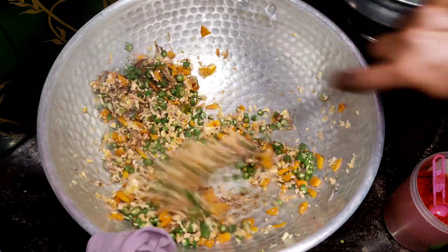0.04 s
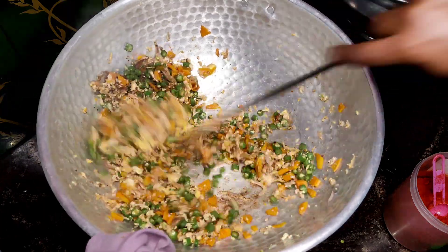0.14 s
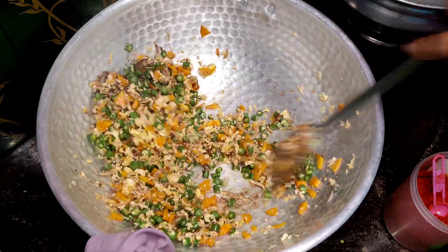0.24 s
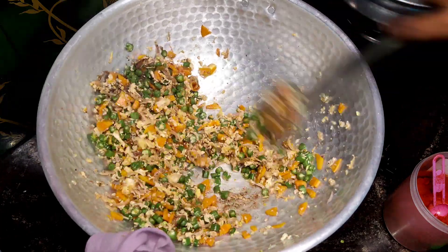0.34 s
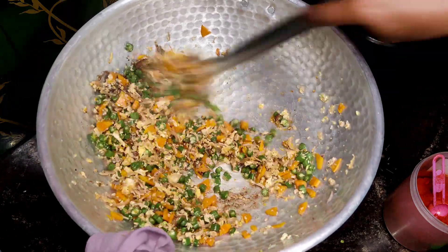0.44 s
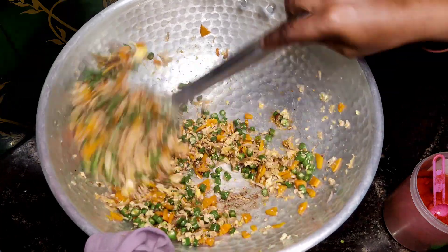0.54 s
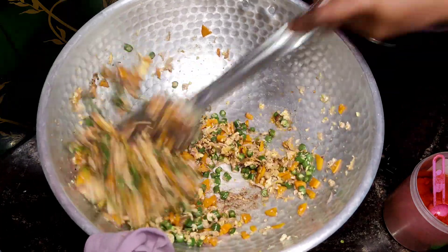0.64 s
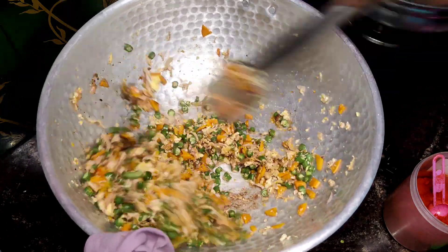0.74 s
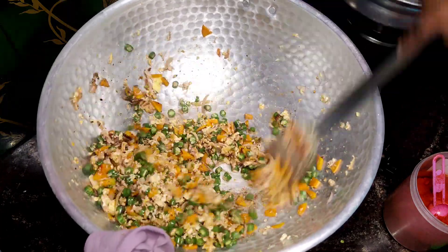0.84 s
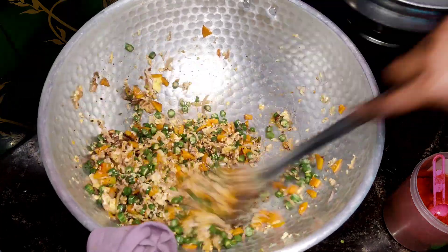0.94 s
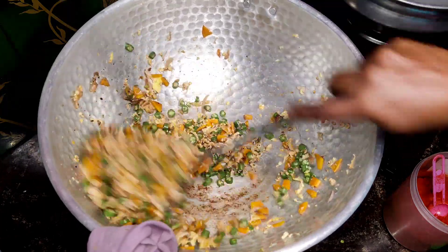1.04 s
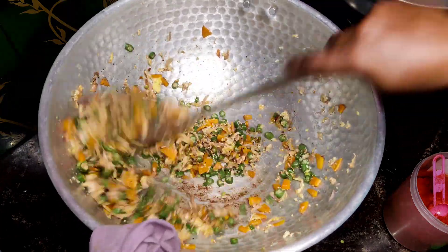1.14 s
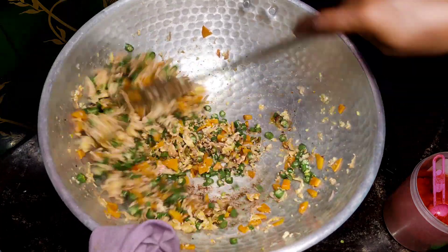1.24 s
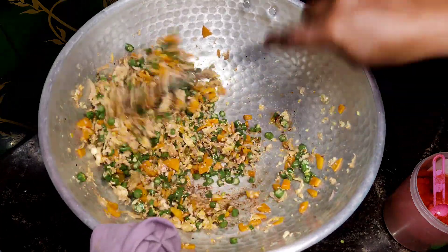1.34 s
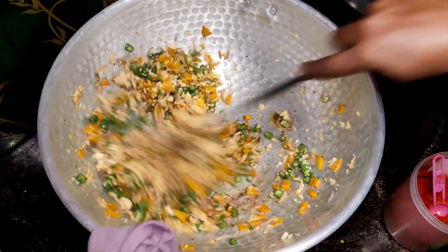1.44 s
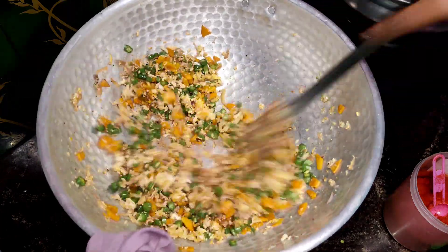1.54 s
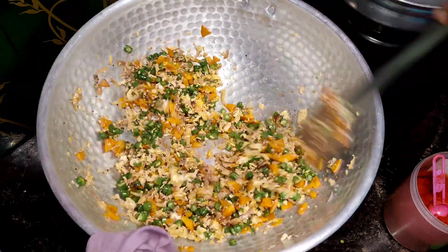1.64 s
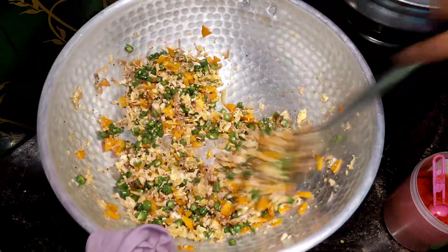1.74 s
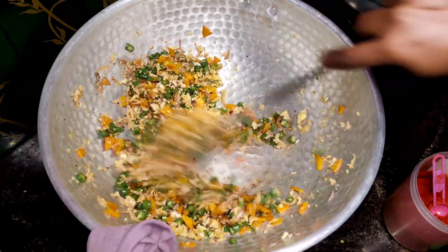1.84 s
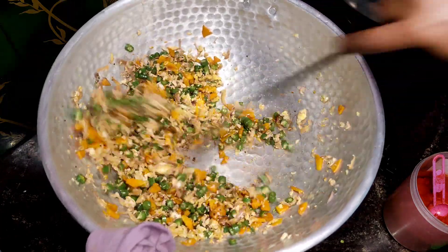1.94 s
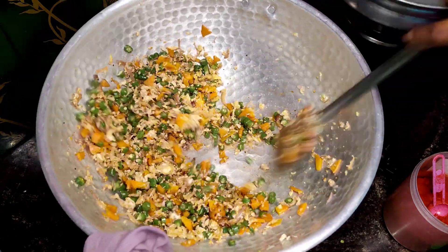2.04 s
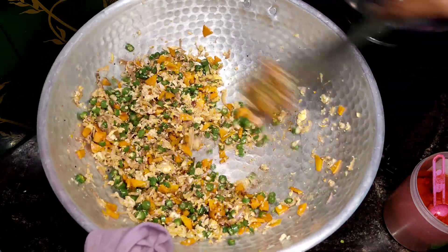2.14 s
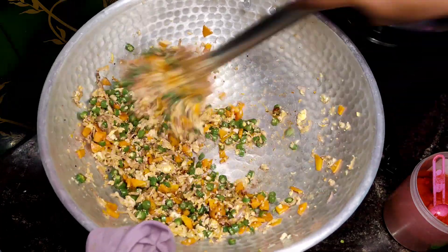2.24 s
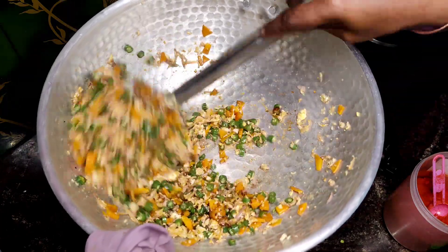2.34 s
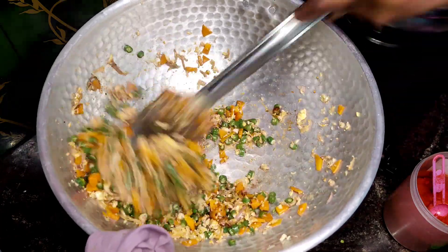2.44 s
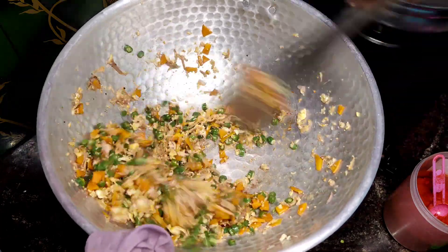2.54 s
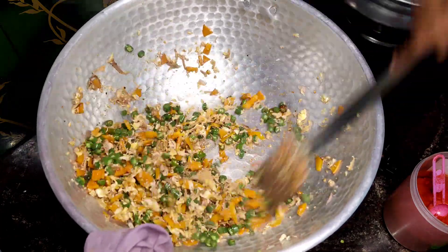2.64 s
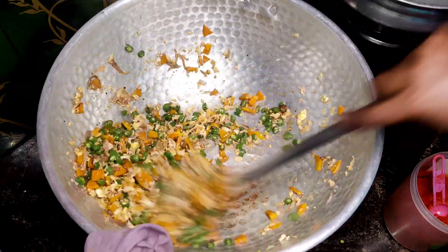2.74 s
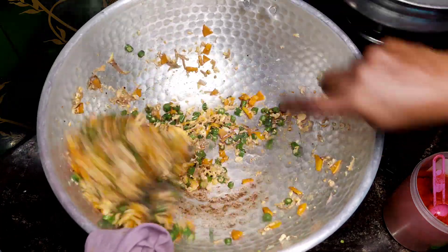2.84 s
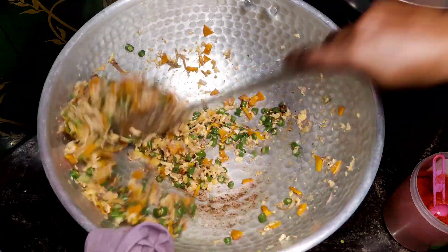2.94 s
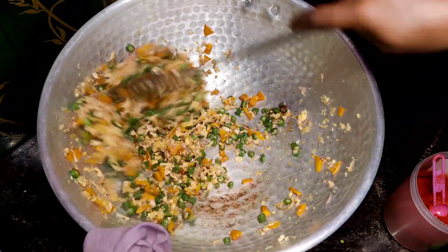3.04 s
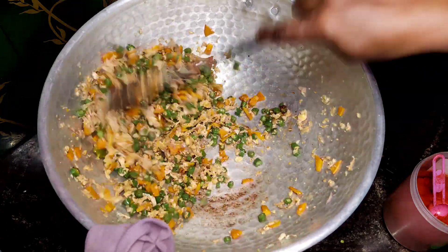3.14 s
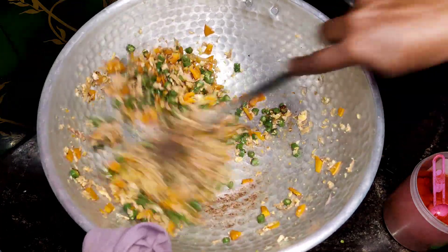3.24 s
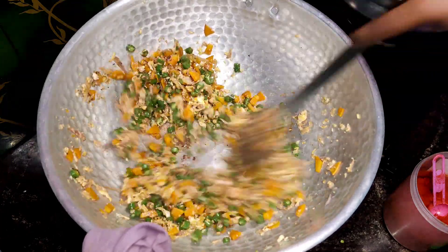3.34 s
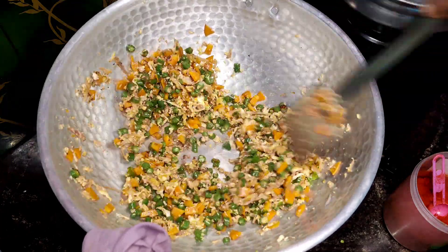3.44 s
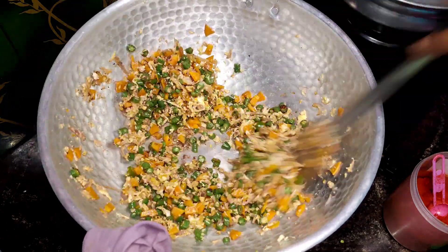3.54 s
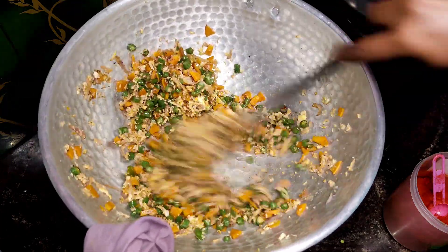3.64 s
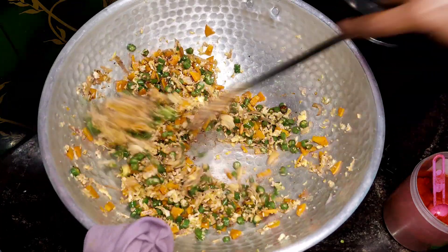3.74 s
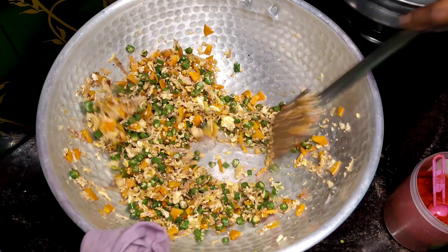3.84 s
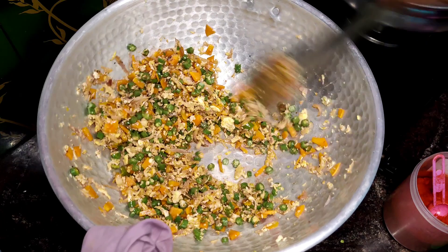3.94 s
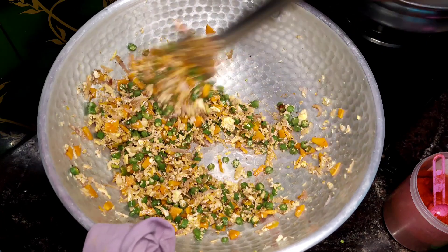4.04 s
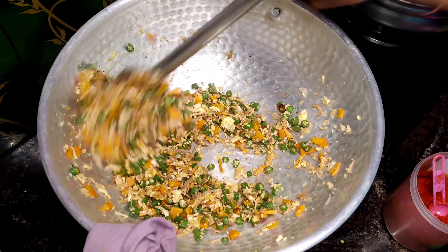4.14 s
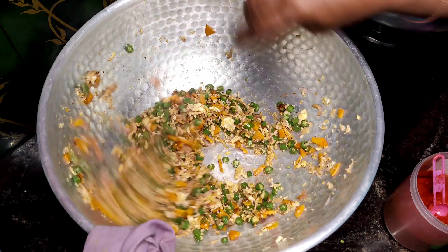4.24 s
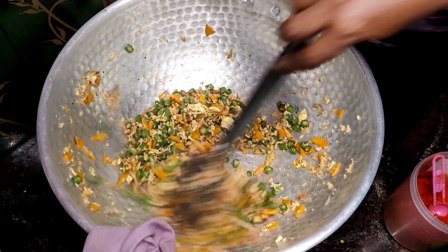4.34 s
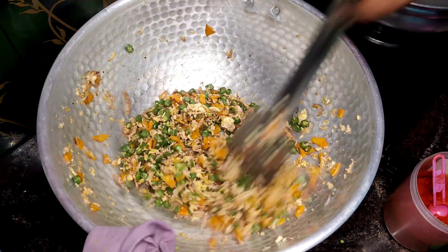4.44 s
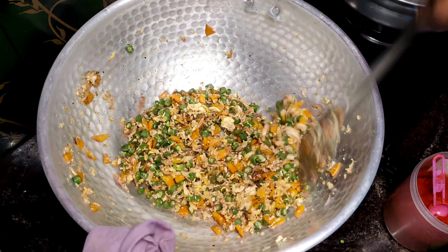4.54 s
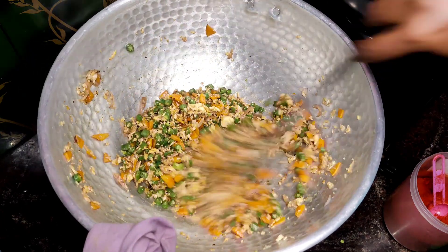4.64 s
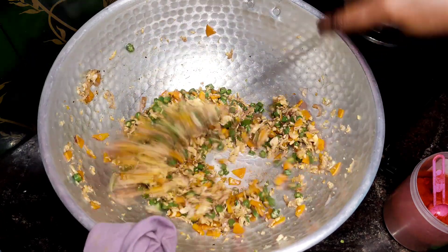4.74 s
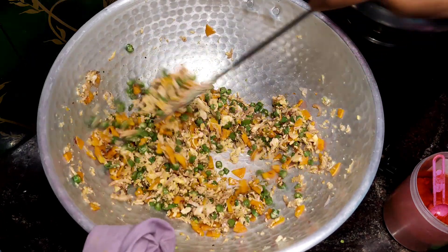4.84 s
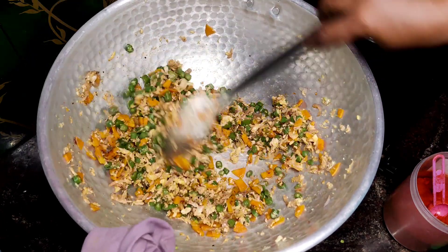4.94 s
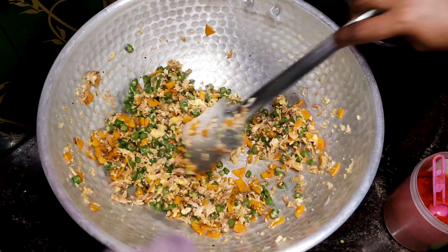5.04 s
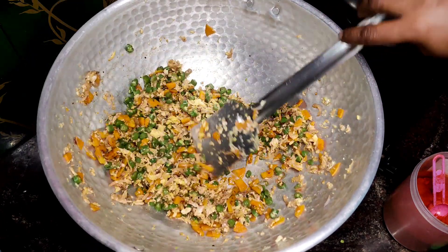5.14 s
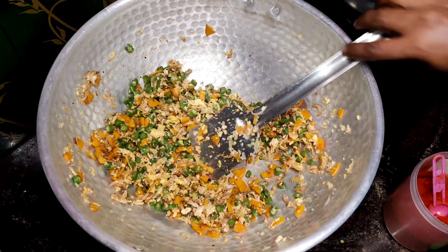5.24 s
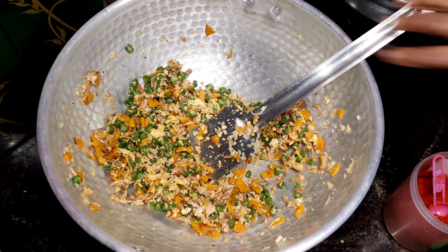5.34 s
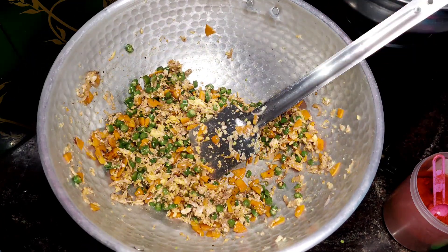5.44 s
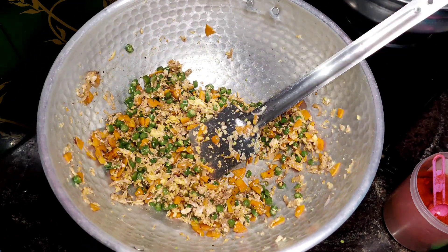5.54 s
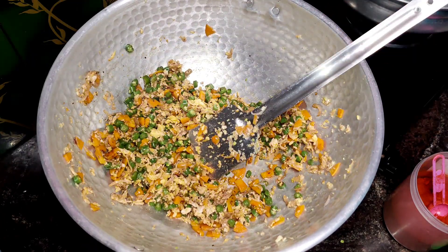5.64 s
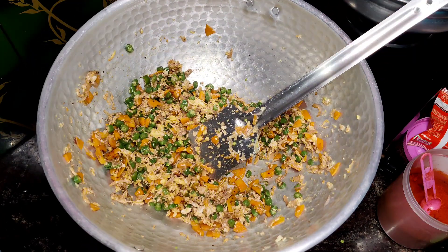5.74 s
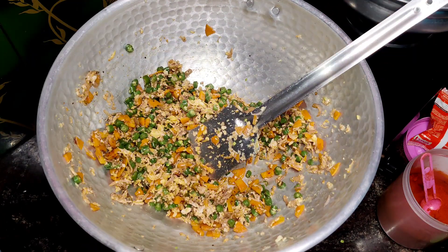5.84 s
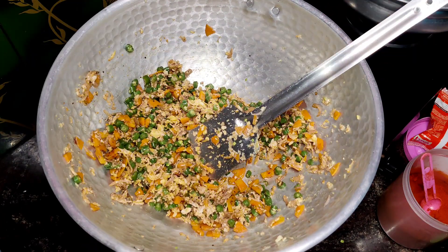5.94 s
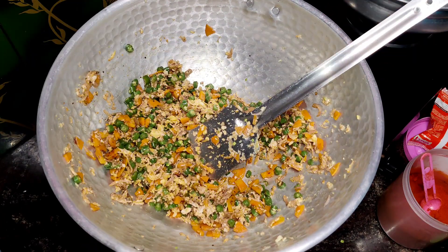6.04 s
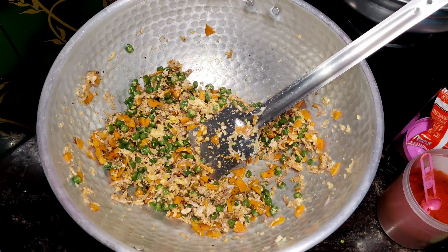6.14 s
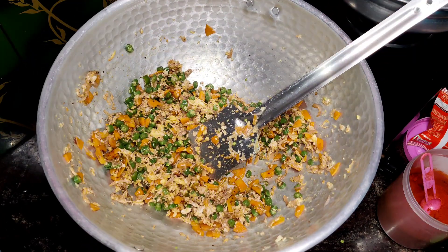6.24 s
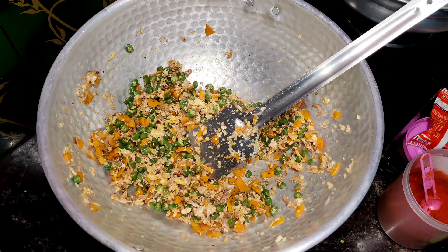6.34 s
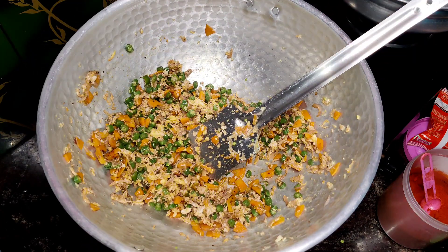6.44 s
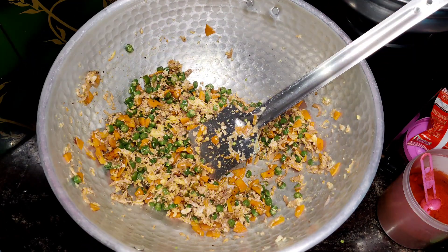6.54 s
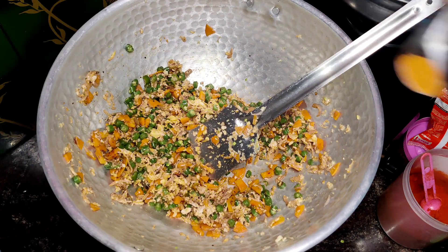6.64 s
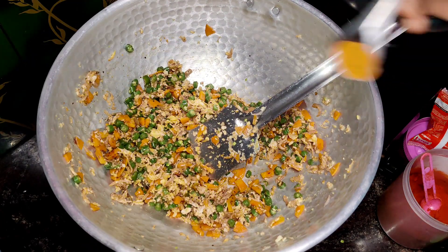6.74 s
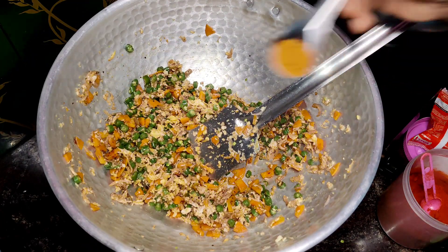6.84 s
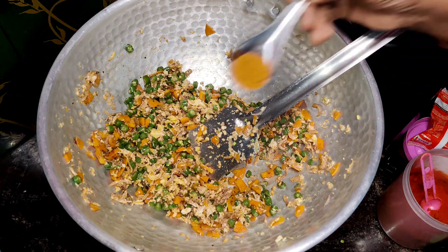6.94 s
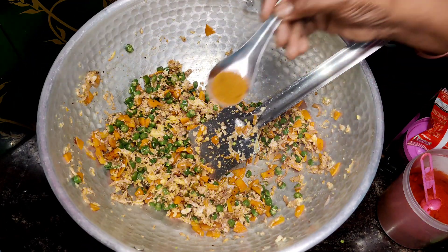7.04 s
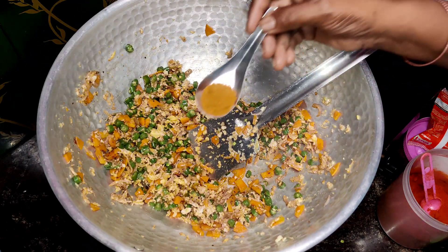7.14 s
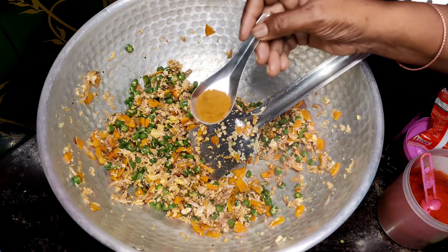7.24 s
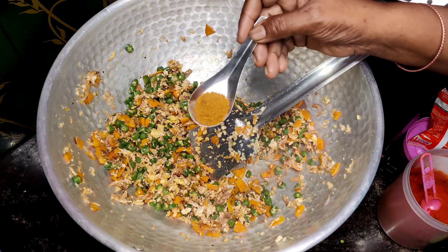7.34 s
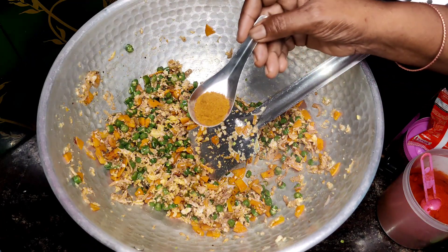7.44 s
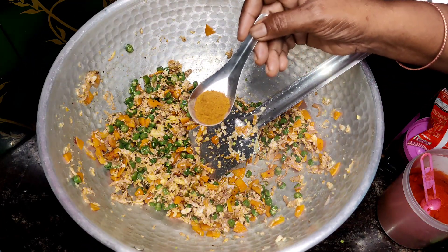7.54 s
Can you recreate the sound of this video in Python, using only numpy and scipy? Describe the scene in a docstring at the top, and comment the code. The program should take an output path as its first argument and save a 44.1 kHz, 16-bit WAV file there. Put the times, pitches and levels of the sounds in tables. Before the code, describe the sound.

Quick scrapes and clanks of a steel spatula stir-frying in a thin wok, ending in a ringing clatter over soft sizzling.

```python
"""Stir-frying in a wok

A steel spatula turns fried egg and vegetables in a thin hammered wok in a small kitchen. Impacts excite
the modes of bowl and blade as a clank, stick-slip friction makes the blade judder along the metal, and
tossed food lands with a thud. At last the spatula is dropped into the wok and a jar is handled.
Bursts of steam sizzle faintly throughout, with an odd pop, over the burner's rumble and a low hum."""
import sys
import numpy as np
from scipy import signal
from scipy.fft import rfft, irfft
from scipy.io import wavfile

SR = 44100
rng = np.random.default_rng(int(sys.argv[2]) if len(sys.argv) > 2 else 0)


def persist_wave(psi):
    """Save psi, clipped to +-1, as 16-bit WAV."""
    counts = np.round(np.clip(psi, -1, 1) * 32767).astype(np.int16)
    wavfile.write(sys.argv[1], SR, np.atleast_2d(counts).T)


N = 335160
TIME = np.arange(N) / SR
RING_TIME = np.arange(SR // 2) / SR

# pushes of the blade, each swelling up to its start:
# start_s, swell_s, length_s, judder_db, rasp_db, hiss_db, slope_db_per_s, edge_hz, edge_lift_db
STROKES = [(0.0, .02, 0.0064, -42, -47, -31, 3, 4430, 9),
           (0.087, 0.039, 0.0071, -40.5, -27.5, -35.5, -16, 3000, 22),
           (0.447, 0.033, 0.11, -31, -34.5, -32, 2, 3200, 5.5),
           (1.004, 0.062, 0.081, -35.5, -34, -32, -63, 1940, 2),
           (1.44, 0.028, 0.21, -51, -49, -45.5, -19, 2500, 5),
           (1.837, 0.041, 0.034, -34, -31, -33.5, 35, 2920, 3),
           (2.212, 0.077, 0.15, -39.5, -39, -34, 4, 3340, 12),
           (2.703, 0.054, 0.16, -38.5, -38.5, -34, -12.5, 3000, -1.5),
           (3.305, 0.04, 0.065, -49, -45.5, -46, -22, 2460, 3),
           (3.608, 0.028, 0.069, -50, -46, -41.5, -52, 2530, 4),
           (4.113, 0.11, 0.11, -29, -36.5, -30, -34, 1950, 4),
           (4.234, 0.038, 0.041, -21, -41, -31.5, -33, 2500, 5),
           (4.331, 0.03, 0.022, -28, -41, -34, -68, 6600, 6),
           (4.718, 0.02, 0.02, -24, -25.5, -26, -80, 3500, 14)]
# blade strikes wok: start_s, tick_db, thud_db, contact_hz
STRIKES = [(0.05, -38, -39, 4400), (0.0797, -29, -36, 3660), (0.0951, -34, -49, 3300),
           (0.1112, -34.5, -41, 3300), (0.511, -35, -41, 5840), (0.4226, -36, -37.5, 3130),
           (0.449, -45, -31.5, 3400), (0.8715, -16, -27.5, 5550), (0.9909, -34.5, -38, 2880),
           (1.431, -36, -35, 4630), (1.7419, -29, -32, 4030), (1.7502, -19, -27.5, 4750),
           (2.0597, -42, -32, 2900), (2.155, -21, -31, 4900), (2.298, -30, -38, 3430),
           (2.6297, -21.5, -25.5, 3760), (3.5637, -29, -42, 6000), (3.8657, -39.5, -35, 3200),
           (3.9674, -32, -37.5, 3730), (3.988, -52, -40.5, 3400), (4.0133, -29.5, -41, 6440),
           (4.129, -35, -34, 4200), (4.6847, -26.5, -30.5, 4700), (4.716, -27, -31, 3170),
           (5.508, -41, -63, 6000), (5.521, -52, -61, 6000)]
# tossed food falls back: start_s, thud_db
LANDINGS = [(0.2273, -39.5), (0.664, -44), (0.6825, -46.5), (1.119, -39), (1.5886, -35.5), (2.378, -43),
            (2.432, -42.5), (3.085, -46.5), (3.103, -57), (3.2071, -20), (3.218, -21), (3.655, -44),
            (4.198, -27.5), (4.2575, -28), (4.2673, -23), (4.282, -22), (4.293, -24.5), (4.9635, -47.5)]
# fat spits: start_s, level_db, pitch_hz
POPS = [(0.323, -40.5, 6450), (0.809, -38.5, 6290), (1.3603, -41, 2860), (4.5489, -38.5, 5820),
        (5.681, -47, 5950), (6.0693, -52.5, 6120), (6.127, -44.5, 3540), (6.3762, -49, 6470),
        (6.4018, -48.5, 3540), (6.608, -51, 2970), (6.6355, -51, 6730), (6.8623, -43, 3330),
        (7.156, -52, 5250), (7.2455, -50, 6490), (7.4133, -45, 2800)]
# hard crumbs crack: start_s, level_db
CRUMBS = [(0.4825, -34), (0.6405, -36), (3.622, -41), (3.8052, -44), (4.0977, -26.5), (4.2205, -27),
          (4.2412, -23.5), (4.4285, -34.5)]
# loose food rolls down the wall: start_s, length_s, level_db
TUMBLES = [(1.28, 0.1, -51.5), (1.966, 0.068, -48.5), (3.754, 0.079, -51), (4.625, 0.043, -56),
           (4.853, 0.078, -47.5)]
# the dropped spatula bounces: start_s, gain_db
BOUNCES = [(5.3258, 0), (5.338, -5), (5.349, -8.5), (5.366, -11.5), (5.416, -18.5)]
# course of the burner's rumble: time_s, level_db
FLAME_LEVELS = [(0, -52.5), (5.9, -55), (6.6, -53), (7.6, -48)]
# partials of the hum: pitch_hz, level_db
HUM_PARTIALS = [(84, -69.5), (155.5, -64.5)]
# modes of the loaded bowl, its flexing rim, the spatula and a jar: pitch_hz, level_db, t60_s
BOWL_MODES = [(195, -13.5, 0.61), (303.3, -1.5, 0.38), (405, -3, 0.086), (453, -4, 0.075), (480.5, -8, 0.3),
              (604, -22, 0.14), (704, -1.5, 0.22), (803, -17, 0.39), (920, -7, 0.45)]
RIM_MODES = [(100, -6, 0.27), (158, 0.5, 0.029)]
STEEL_MODES = [(541, -4, 0.22), (712, -16, 0.3), (963, -11.5, 0.33), (1890, -13.5, 0.43),
               (2030, -10.5, 0.4), (2934, -10, 0.17), (3260, -5.5, 0.33), (3697, 5.5, 0.14),
               (3755, -10.5, 0.28), (3920, -18, 0.34), (4330, -4, 0.25), (4710, -3.5, 0.22),
               (5200, -4, 0.26), (6130, -13, 0.36), (6400, -6, 0.26)]
JAR_MODES = [(463, -2, .25), (786, -6, .25), (1174, -10, .3), (1540, -5, .3), (1685, -2, .25)]
# spectra of a slip, frying, the flame, a blow, the flexing bowl and a tapped jar: frequency_hz, gain_db
SCRAPE_COLOUR = [(60, -22.5), (217, -12.5), (310, -6.5), (385, -2), (460, 3), (590, -9.5), (700, -1.5),
                 (810, -10.5), (935, -7.5), (1350, -20), (1700, -16), (1910, -11.5), (2270, -19.5),
                 (2900, -9), (3250, -16), (3750, -13.5), (4150, -13), (5300, -9), (6200, -7.5), (6800, -9),
                 (7300, -14.5), (8200, -21), (9130, -37.5), (16000, -41)]
SIZZLE_COLOUR = [(150, -42), (250, -6), (557, -3), (607, -1), (674, -1), (761, -5.5), (938, -2), (1220, -6),
                 (2810, -2.5), (5160, -1.5), (6940, 1), (9170, -17), (16000, -24)]
FLAME_COLOUR = [(12, -41.5), (20, 2.5), (54, 2), (119, -15.5), (150, -12), (184, -20.5), (285, -25),
                (366, -36), (400, -45), (520, -58), (880, -120)]
BLOW_COLOUR = [(35, -16), (60, -9), (180, -9), (363, -13), (732, -12.5), (1010, -2), (1170, -10),
               (1950, -8), (3040, -9), (3760, -5.5), (4120, -7.5), (6430, -4), (8320, -18), (9130, -29),
               (16000, -39)]
THUD_COLOUR = [(47, -72), (80, -24), (221, -8.5), (290, -0.5), (462, 0.5), (701, -9), (833, -6),
               (941, -11.5), (1500, -22), (1950, -62), (3300, -120)]
TAP_COLOUR = [(200, -9), (450, -5), (1700, -3), (2300, -12), (8000, -36)]
# spread between the ears: frequency_hz, side_gain_db
STEREO_WIDTH = [(100, -16), (330, -16.5), (700, -3.5), (1300, -2), (4400, 0.5), (8000, -7.5), (14000, -12)]
# bands of the bowl's lows, the mid clank and the bright top: low_hz, high_hz
BANDS = [(90, 1200), (1200, 4000), (4000, 16000)]


def undb(db):
    """Amplitude grows tenfold for every 20 dB."""
    return 10 ** (np.asarray(db) / 20)


def unit(x):
    """Normalisation to an rms of 1."""
    return x / np.sqrt(np.mean(x ** 2))


def add(out, start_s, sound):
    """Superposition: a sound joins the mix at start_s."""
    start = int(start_s * SR)
    out[:, start:start + sound.shape[1]] += sound[:, :N - start]


def excite(response, force):
    """Convolution: a linear body answers each instant of a force with its impulse response."""
    return signal.fftconvolve(response, force[None], axes=1)[:, :len(force)]


def colour(x, points, size=4096):
    """Minimum-phase filtering: folding the cepstrum gives a causal response with the given spectrum."""
    hz, db = np.transpose(points)
    bins_hz = np.arange(size // 2 + 1) * SR / size
    gain = undb(np.interp(np.log(bins_hz + 1), np.log(hz), db))
    cepstrum = irfft(np.log(gain))
    cepstrum[1:size // 2] *= 2
    cepstrum[size // 2 + 1:] = 0
    response = irfft(np.exp(rfft(cepstrum)))
    return signal.fftconvolve(x, response[None], axes=1)[:, :x.shape[1]]


def resonance(x, hz, width_hz, db):
    """A second-order resonator lifts or lowers one band by db."""
    b, a = signal.iirpeak(hz, hz / width_hz, fs=SR)
    return x + (undb(db) - 1) * signal.lfilter(b, a, x)


def bands(x):
    """Band-pass filtering separates lows, mids and highs."""
    return [signal.sosfilt(signal.butter(4, edges, "band", fs=SR, output="sos"), x) for edges in BANDS]


def walk(rate_hz):
    """Interpolated noise wanders smoothly, with a spread near 1."""
    knots = rng.standard_normal(N // 40)
    return np.interp(TIME * rate_hz, np.arange(len(knots)), knots)


def clicks(per_s, scatter_db):
    """A Poisson process: independent impulses, a few larger than the rest."""
    size = undb(scatter_db * np.minimum(rng.exponential(size=N), 4))
    return unit((rng.random(N) < per_s / SR) * size * rng.choice([-1, 1], N))


def modes(table, scatter_db, sustain=1, detune=0):
    """Damped normal modes, mid and side; grip and point of contact shift their strengths and pitches."""
    hz, db, t60 = np.transpose(table)[:, :, None]
    hz = hz * (1 + detune * rng.standard_normal(hz.shape))
    ring = np.exp((2j * np.pi * hz - np.log(1000) / (t60 * sustain)) * RING_TIME)
    weight = undb(db.T + scatter_db * rng.standard_normal((2, len(table))))
    phase = np.exp(2j * np.pi * rng.random(weight.shape))
    return unit(((weight * phase) @ ring).real)


def dense_modes(t60_s, room_db, room_t60_s):
    """Modal overlap: countless close modes decay as noise, followed by the kitchen's reverberation."""
    fade = undb(-60 * RING_TIME / t60_s) + undb(room_db - 60 * RING_TIME / room_t60_s)
    return rng.standard_normal((2, len(RING_TIME))) * fade


def pressure(t, swell_s, length_s, slope_db_per_s, release_db_per_s=219):
    """Envelope of a contact force: a linear swell up to t = 0, a sloping hold, an exponential release."""
    held_db = slope_db_per_s * np.clip(t, 0, length_s)
    released_db = release_db_per_s * np.maximum(t - length_s, 0)
    return np.clip(1 + t / swell_s, 0, 1) * undb(held_db - released_db)


def slip_response(way, edge_hz, edge_lift_db, sag=0.03):
    """Resonances move with the contact (way, 0 to 1): the edge's sags and fades, a bright one arches."""
    wok = colour(dense_modes(t60_s=0.015, room_db=-17.5, room_t60_s=0.33), SCRAPE_COLOUR)
    wok = resonance(wok, edge_hz * (1 + sag * (.5 - way)), width_hz=450, db=edge_lift_db * (1 - way ** 3))
    wok = resonance(wok, 6000 + 600 * np.sin(np.pi * way), width_hz=470, db=3)
    blade = modes(STEEL_MODES, scatter_db=3, sustain=.2, detune=.02)
    return bands(unit(wok) + undb(-19) * blade)


def crunch():
    """Brittle fracture: one hard crumb gives a dry snap under the edge."""
    snap = colour(dense_modes(t60_s=0.003, room_db=-17.5, room_t60_s=0.17), SCRAPE_COLOUR)
    return sum(bands(resonance(snap, 5600, width_hz=2000, db=4))[1:])


def scrapes(chatter_db=2, judder_lag_s=0.017, tail_s=0.19, spots=5):
    """Stick-slip friction over the dimples: coarse slips shake the bowl, fine ones hiss, crumbs crunch."""
    grip = undb(chatter_db * walk(rate_hz=110))
    coarse = grip * clicks(per_s=380, scatter_db=1.5)
    fine = grip * clicks(per_s=1800, scatter_db=2)
    rim = unit(excite(modes(RIM_MODES, scatter_db=1), coarse)) * undb(-54)
    ring = unit(excite(modes(BOWL_MODES, scatter_db=1.5), coarse)) * undb(-15)
    grit = unit(excite(crunch(), clicks(per_s=130, scatter_db=1))) * undb(-11)
    out = np.zeros((2, N))
    for start_s, swell_s, length_s, judder_db, rasp_db, hiss_db, slope, edge_hz, lift_db in STROKES:
        on = (TIME > start_s - swell_s) & (TIME < start_s + length_s + tail_s)
        t = TIME[on] - start_s
        edge = pressure(t, swell_s, length_s, slope)
        bowl = pressure(t, swell_s, length_s + judder_lag_s, slope)
        judder, rasp, hiss = bowl * undb(judder_db), edge * undb(rasp_db), edge * undb(hiss_db)
        out[:, on] += bowl * rim[:, on] + judder * ring[:, on] + hiss * grit[:, on]
        # the blade travels past several spots, each with its own colour
        travel = (spots - 1) * np.cumsum(edge) / edge.sum()
        for spot in range(spots):
            nearness = np.sqrt(np.clip(1 - abs(travel - spot), 0, 1))
            responses = slip_response(spot / (spots - 1), edge_hz, lift_db)
            for response, slips, gain in zip(responses, (coarse, fine, fine), (judder, rasp, hiss)):
                sound = excite(response[:, :len(t)], slips[on])
                out[:, on] += sound / np.std(sound[0]) * nearness * gain
    return out


def sizzle(fry_db=-47, lull_s=5.74, lull_db=-56.5, build_db_per_s=2, flicker_db=.7):
    """Shot noise: tiny steam bursts merge into a hiss; drying food crackles lower and more sparsely."""
    bursts = np.array([clicks(per_s=1200, scatter_db=0.5) for _ in range(2)])
    hiss = colour(bursts + rng.standard_normal((2, N)), SIZZLE_COLOUR)
    snap = colour(dense_modes(t60_s=0.029, room_db=-18, room_t60_s=0.18), SIZZLE_COLOUR)
    snap = resonance(snap, 2650, width_hz=460, db=11)
    crackle = excite(snap, clicks(per_s=60, scatter_db=3.5))
    # steady, then an abrupt lull from which it slowly builds
    level_db = np.where(TIME < lull_s, fry_db, lull_db + build_db_per_s * (TIME - lull_s))
    return (unit(hiss) + undb(-13) * unit(crackle)) * undb(level_db + flicker_db * walk(rate_hz=15))


def burner():
    """Combustion noise: the flame gives a soft, low rumble."""
    time_s, level_db = np.transpose(FLAME_LEVELS)
    rumble = unit(colour(rng.standard_normal((2, N)), FLAME_COLOUR))
    return rumble * undb(np.interp(TIME, time_s, level_db))


def hum(waver=.006, side=0.38):
    """Slight frequency modulation: two faint low tones waver together in pitch."""
    clock_s = np.cumsum(1 + waver * walk(rate_hz=2)) / SR
    tone = sum(undb(db) * unit(np.sin(2 * np.pi * hz * clock_s)) for hz, db in HUM_PARTIALS)
    return np.array([tone, side * tone])


def flex(t60_s, modes_db=-8):
    """Damped flexure of the bowl: the food soon stops most of it, while a few modes linger."""
    thud = colour(dense_modes(t60_s, room_db=-14, room_t60_s=0.46), THUD_COLOUR)
    return unit(thud) + undb(modes_db) * modes(BOWL_MODES, scatter_db=0.5)


def impact(ring, thud, contact_hz, levels_db, contact_db=5, cushion_s=.0005):
    """A brief force excites a wide spectrum; levels_db sets the attacks of thud, clank and tick."""
    crack = colour(dense_modes(t60_s=0.043, room_db=-10.5, room_t60_s=0.4), BLOW_COLOUR)
    crack = unit(resonance(crack, contact_hz, width_hz=350, db=contact_db))
    cushion = 1 - np.exp(-RING_TIME / cushion_s)  # food softens the contact
    low = bands(thud + ring)[0]
    _, clank, tick = bands((crack + ring) * cushion)
    attack_samples = (SR // 40, SR // 40, SR // 160)
    return sum(part * undb(db) / np.std(part[:, :attack], axis=1, keepdims=True)
               for part, db, attack in zip((low, clank, tick), levels_db, attack_samples))


def strikes(even_hz=2560, clank_db_per_octave=-14.5):
    """Impact excitation: the blade hits the wok and sets the rim flexing; the hand damps the steel."""
    out = np.zeros((2, N))
    for start_s, tick_db, thud_db, contact_hz in STRIKES:
        # the higher the contact's pitch, the less clank beside the tick
        clank_db = tick_db + clank_db_per_octave * np.log2(contact_hz / even_hz)
        steel = undb(-8) * modes(STEEL_MODES, scatter_db=10, sustain=0.51, detune=0.0141)
        rim = undb(-16) * modes(RIM_MODES, scatter_db=4)
        thud = 0.71 * flex(t60_s=0.04, modes_db=-4)
        add(out, start_s, impact(steel + rim, thud, contact_hz, (thud_db, clank_db, tick_db)))
    return out


def landings(slap_hz=5200, slump_s=0.0034, light_db=-40, knock_hz=370, knock_t60_s=0.0064):
    """Inelastic collision: food thuds with a faint wet slap; light tosses slump, heavy ones knock."""
    out = np.zeros((2, N))
    knock = np.sin(2 * np.pi * knock_hz * RING_TIME) * undb(-60 * RING_TIME / knock_t60_s)
    knock = undb(2.5) * unit(colour(knock[None], THUD_COLOUR))
    for start_s, thud_db in LANDINGS:
        lightness = undb(light_db - thud_db)
        onset = 1 - np.exp(-RING_TIME / (slump_s * lightness))
        ring = undb(-8.5) * modes(BOWL_MODES, scatter_db=3)
        thud = flex(t60_s=0.024 + 0.023 * min(lightness, 1))
        thud = resonance(thud, 890, width_hz=600, db=-4.5)
        thud += knock * max(1 - lightness, 0) ** 2
        levels_db = (thud_db, thud_db - 23, thud_db - 16)
        add(out, start_s, impact(ring * onset, thud * onset, slap_hz, levels_db))
    return out


def pops():
    """Sudden release of pressure: now and then a larger blister bursts and the fat spits."""
    out = np.zeros((2, N))
    for start_s, level_db, pitch_hz in POPS:
        burst = colour(dense_modes(t60_s=0.0026, room_db=-3.5, room_t60_s=0.092), SIZZLE_COLOUR)
        burst = resonance(burst, pitch_hz, width_hz=470, db=8)
        add(out, start_s, burst * undb(level_db) / np.std(burst[0, :SR // 160]))
    return out


def crumbs():
    """Fracture transients: the largest crumbs snap clearly above the scraping."""
    out = np.zeros((2, N))
    for start_s, level_db in CRUMBS:
        snap = crunch()
        add(out, start_s, snap * undb(level_db) / np.std(snap[0, :SR // 160]))
    return out


def stand_heave(start_s=.872, rock_hz=6.2, rise_s=0.0077, decay_s=0.095):
    """Heavily damped oscillation: the stand gives one slow heave under the hardest blow."""
    out = np.zeros((2, N))
    envelope = (1 - np.exp(-RING_TIME / rise_s)) * np.exp(-RING_TIME / decay_s)
    heave = envelope * np.cos(2 * np.pi * rock_hz * RING_TIME)
    add(out, start_s, undb(-23) * np.array([heave, heave]))
    return out


def tumbles():
    """Random small impacts: loose pieces roll down the wall and patter softly on the bowl."""
    patter = unit(excite(flex(t60_s=0.021), clicks(per_s=170, scatter_db=3)))
    return patter * sum(pressure(TIME - start_s, 0.011, length_s, 0) * undb(level_db)
                        for start_s, length_s, level_db in TUMBLES)


def spatula_drop(body_hz=800, contact_hz=3750):
    """Free vibration: the dropped spatula bounces and rings hollowly until the food damps it."""
    out = np.zeros((2, N))
    for start_s, gain_db in BOUNCES:
        steel = modes(STEEL_MODES, scatter_db=1, sustain=.74, detune=.003)
        steel = resonance(steel, body_hz, width_hz=300, db=4)
        rim = undb(-25) * modes(RIM_MODES, scatter_db=4)
        thud = 0.25 * resonance(flex(t60_s=0.022), body_hz, width_hz=500, db=4)  # no arm's weight
        bounce = impact(steel + rim, thud, contact_hz, levels_db=(-28, -23, -23), contact_db=3)
        add(out, start_s, bounce * undb(gain_db))
    return out


def jar_tap(start_s=5.813):
    """Modal ringing: a spice jar handled beside the stove answers one light tap."""
    out = np.zeros((2, N))
    tap = colour(dense_modes(t60_s=.05, room_db=-8, room_t60_s=.3), TAP_COLOUR)
    ring = modes(JAR_MODES, scatter_db=1, sustain=.8)
    add(out, start_s, undb(-64) * (unit(tap) + .6 * ring))
    return out


def scene(right_lean=0.08, balance_db=0.1):
    """Sources superpose as mid and side: lows reach both ears alike, highs arrive from all around."""
    spatula = scrapes() + crumbs() + spatula_drop() + strikes()
    spatula[1] -= right_lean * sum(bands(spatula[0])[1:])  # the blade's bright sounds lean right
    food = landings() + tumbles() + sizzle() + pops()
    mix = spatula + food + stand_heave() + jar_tap() + burner() + hum()
    mid, side = mix[0], colour(mix[1:], STEREO_WIDTH)[0]
    return np.array([(mid + side) * undb(-balance_db), (mid - side) * undb(balance_db)])


def record(dry):
    """Clipping and band limiting: peaks are held at full scale, then a steep low-pass cuts the top."""
    top_hz = 15900
    return signal.sosfilt(signal.ellip(8, .2, 70, top_hz, fs=SR, output="sos"), np.clip(dry, -1, 1))


dry = scene()
out = record(dry)
persist_wave(out)
```